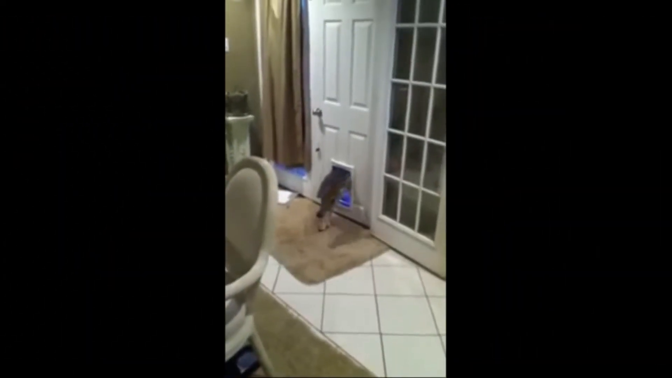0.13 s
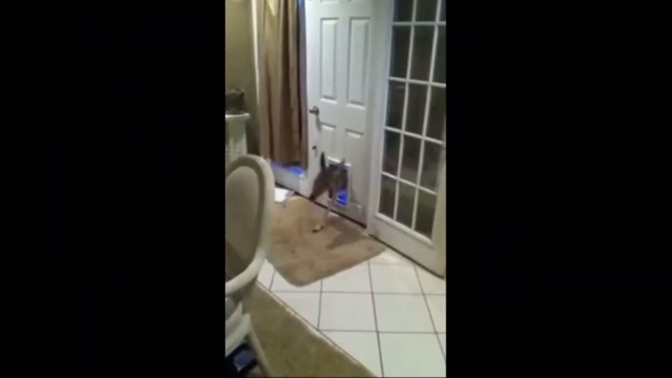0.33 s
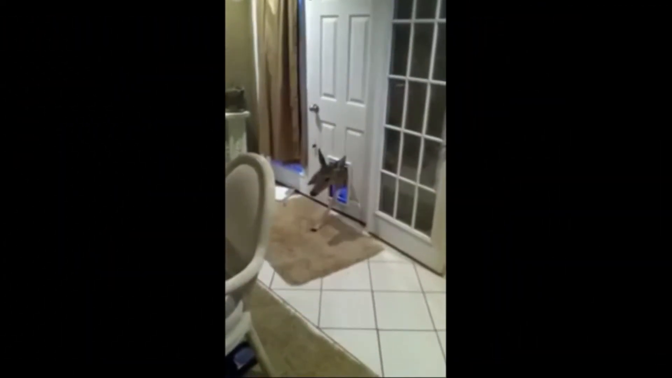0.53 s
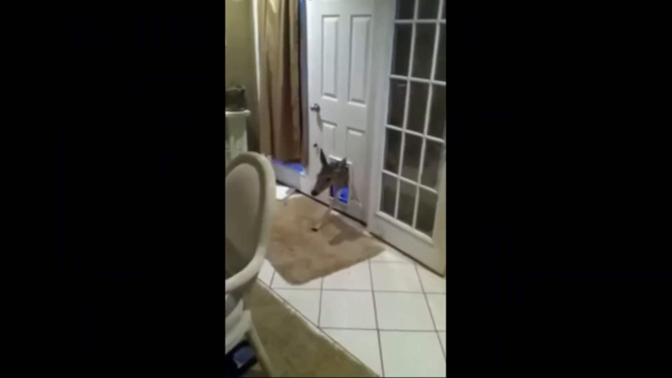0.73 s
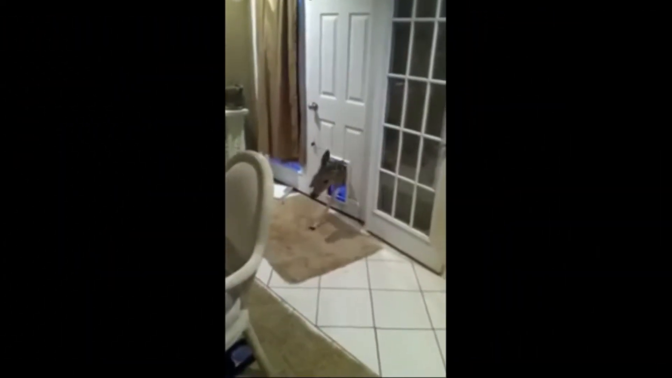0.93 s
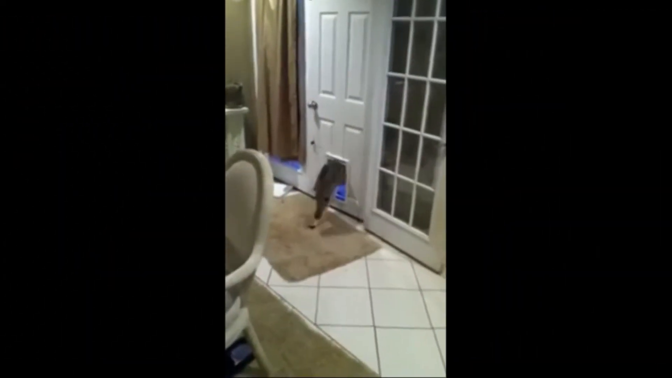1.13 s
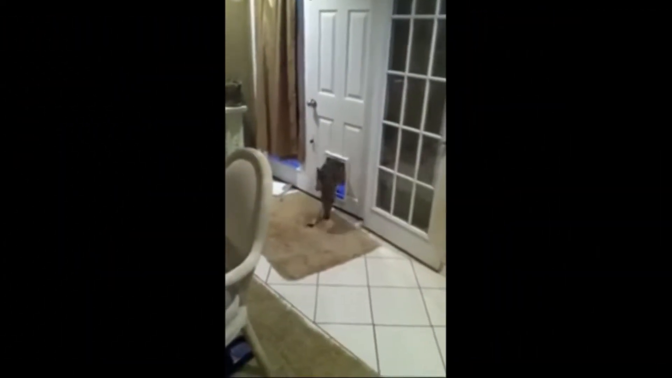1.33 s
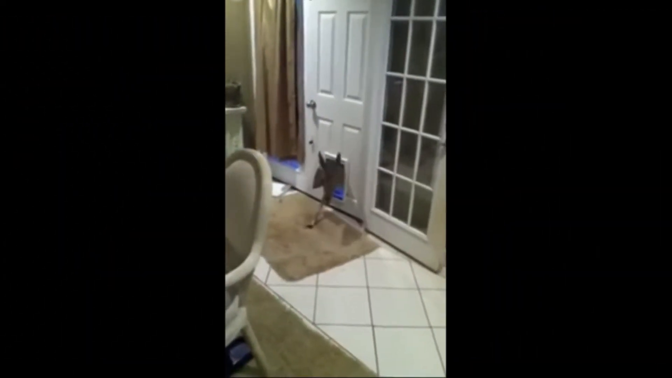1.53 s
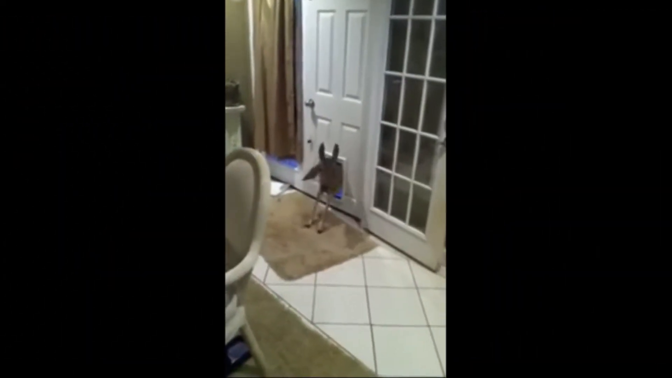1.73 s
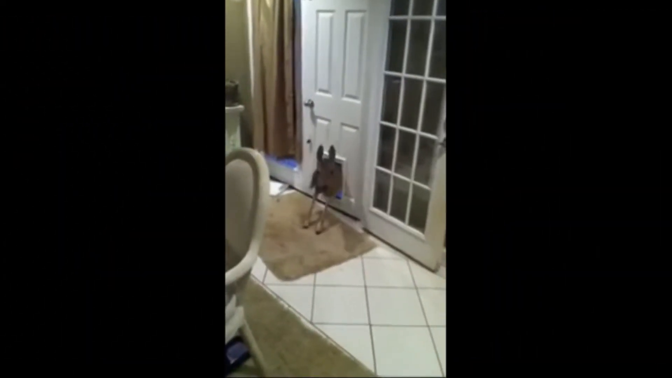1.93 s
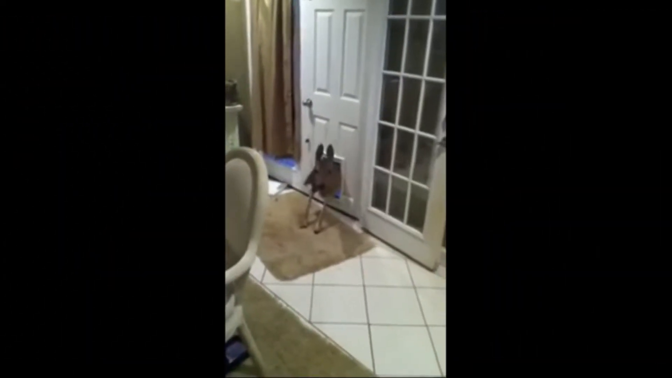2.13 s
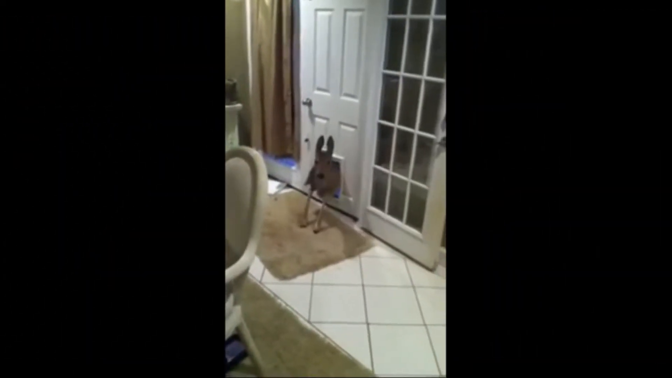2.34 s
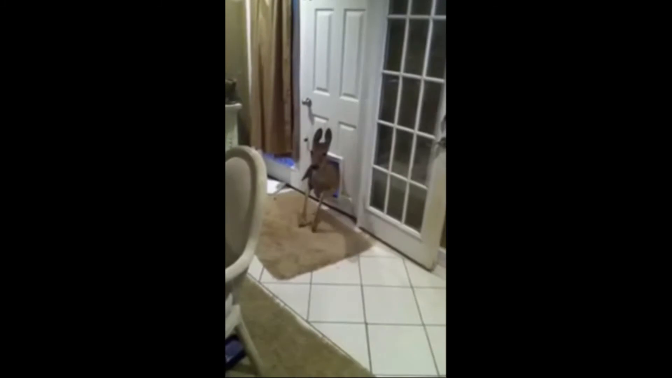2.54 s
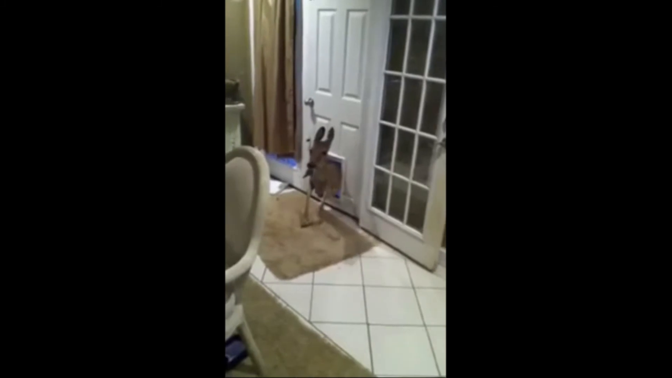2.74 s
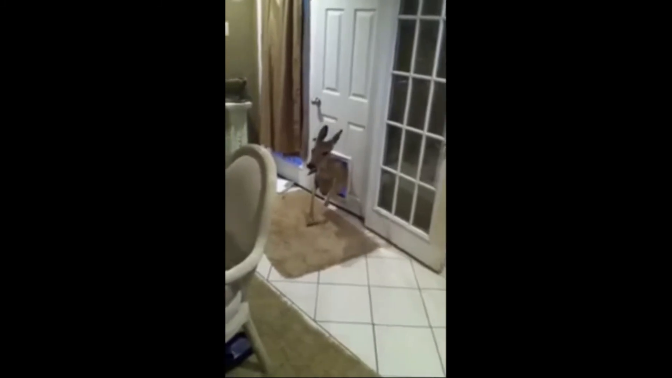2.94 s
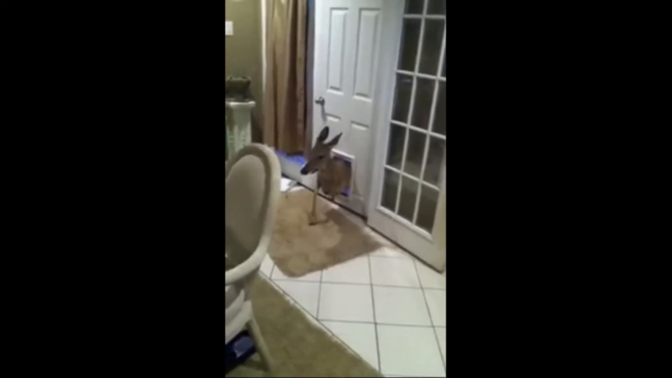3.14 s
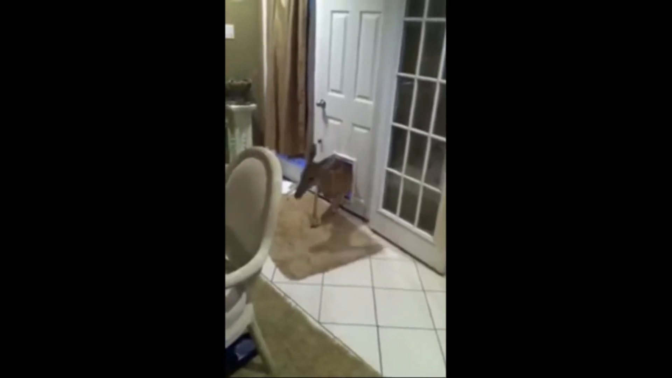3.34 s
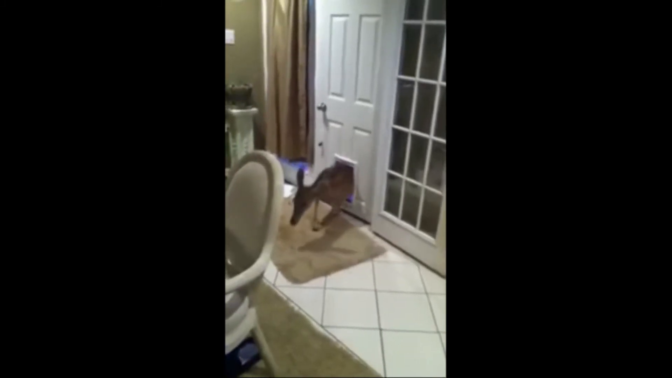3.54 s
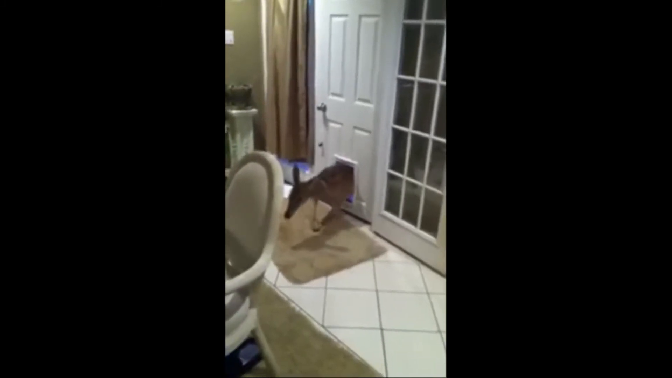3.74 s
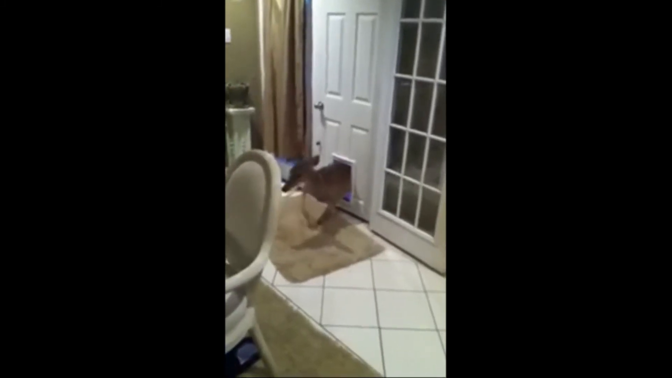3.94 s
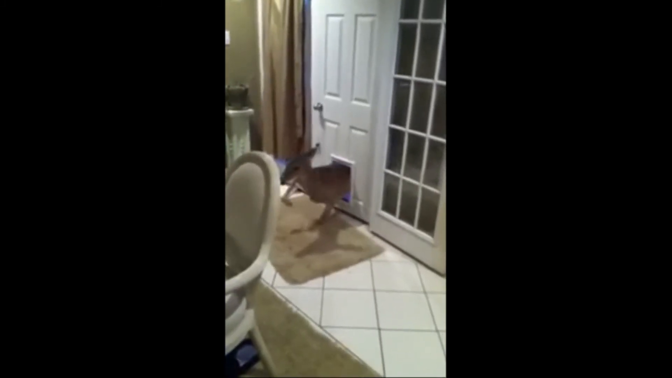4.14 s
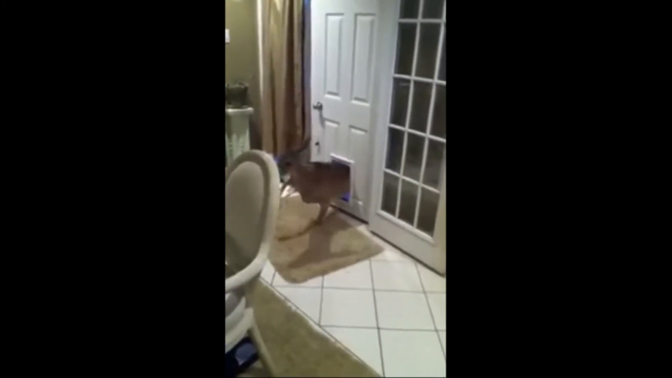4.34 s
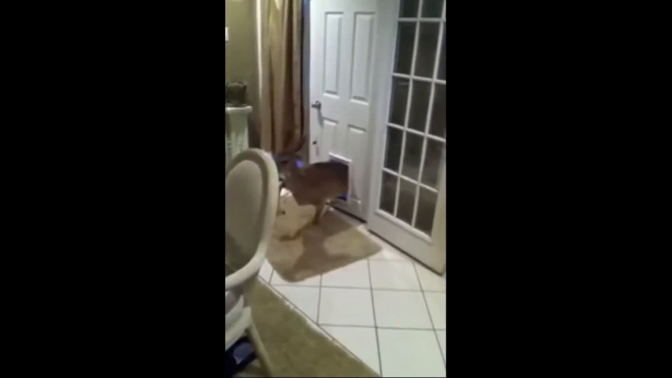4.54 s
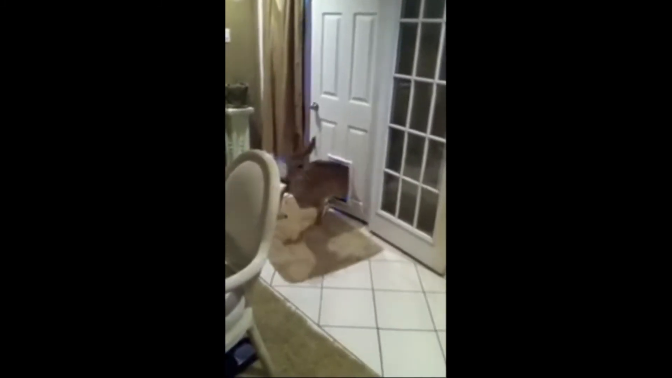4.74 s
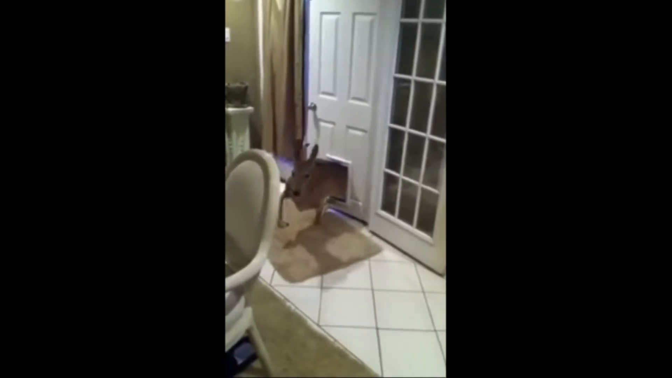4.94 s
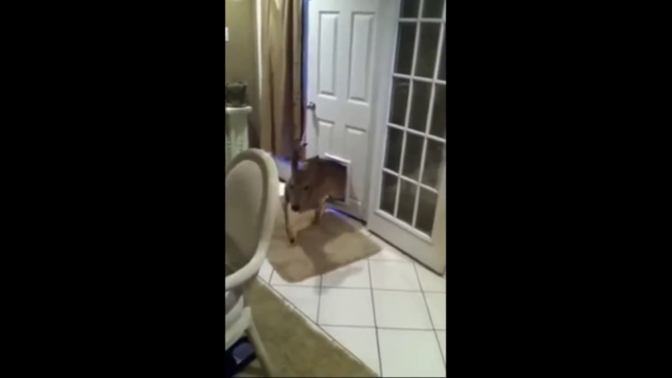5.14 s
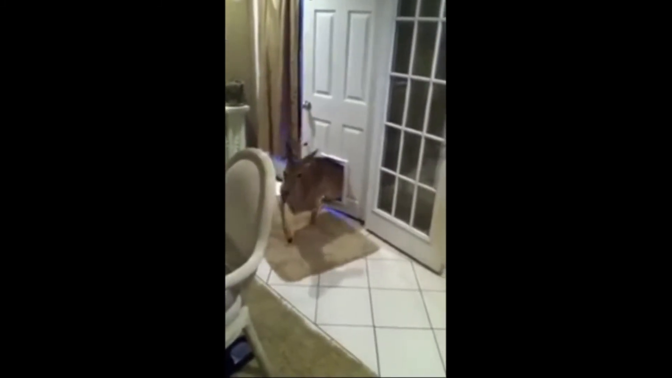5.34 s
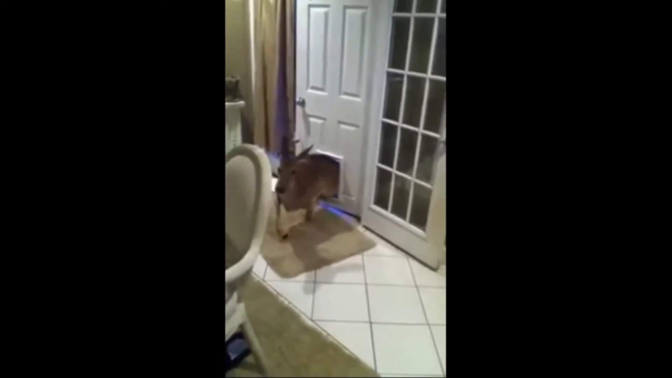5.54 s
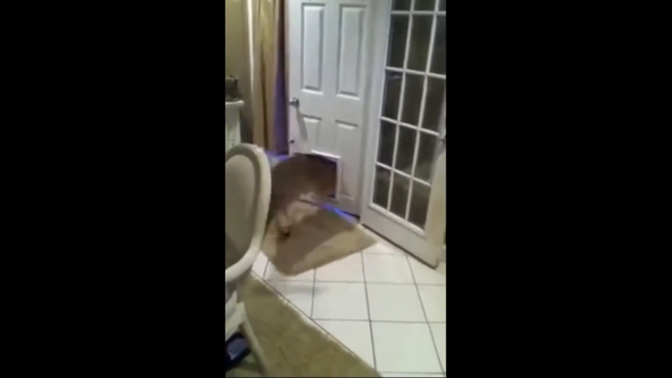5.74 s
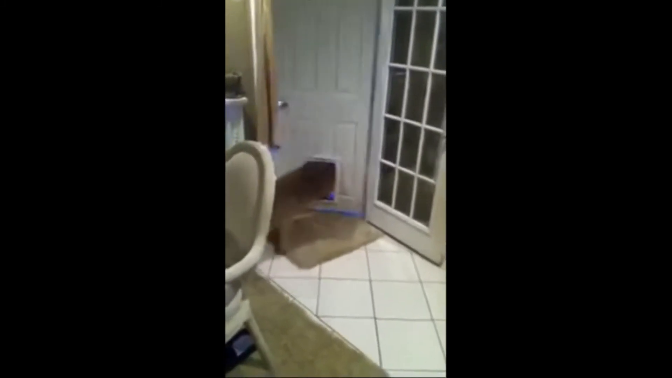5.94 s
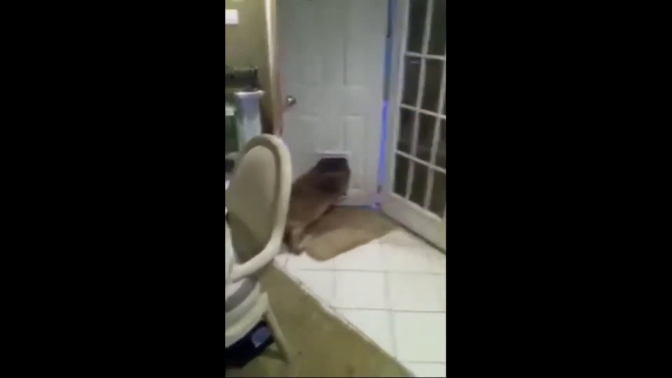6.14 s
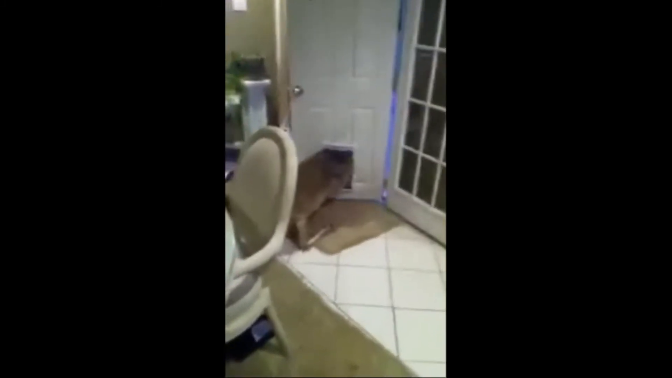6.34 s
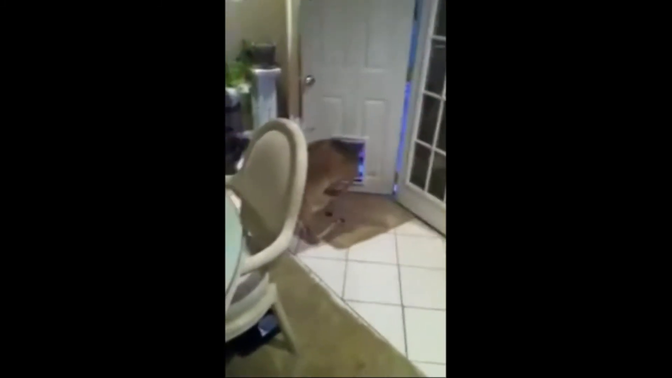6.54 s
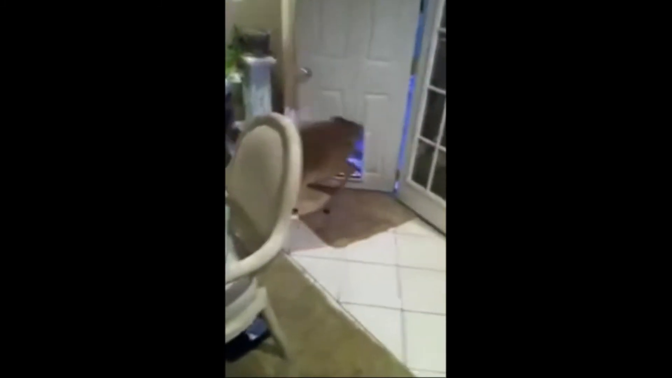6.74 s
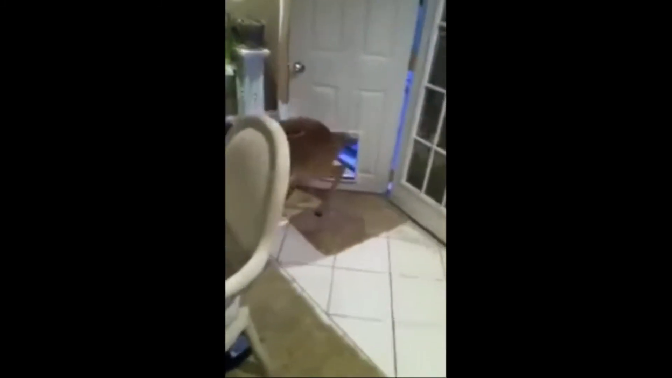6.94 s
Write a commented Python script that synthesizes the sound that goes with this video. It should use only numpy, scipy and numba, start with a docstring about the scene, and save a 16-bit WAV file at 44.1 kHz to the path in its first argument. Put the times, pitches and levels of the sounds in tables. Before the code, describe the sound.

Soft fur rustling and scuffing over a low room hum, then knocks on a door panel and plastic flap build into a volley of loud bangs.

```python
"""Soft rustling and shuffling over a hum come first, then knocks that grow into a volley of bangs.
A young deer squeezes through the pet flap of a house door, a few metres from a phone in a tiled room.
Each blow excites decaying modes of door panel and plastic flap plus a noisy crack; filtered noise makes
the rubbing and shuffling, house air, appliance hum and a faint whine that swells and dies away.
Noise echoes form the room, and the phone turns its gain down after loud bangs."""
import sys
import numpy as np
from scipy import signal
from scipy.fft import rfft, irfft
from scipy.io import wavfile
from scipy.ndimage import uniform_filter1d
from numba import njit

SR = 44100
rng = np.random.default_rng(int(sys.argv[2]) if len(sys.argv) > 2 else 0)


def inscribe(sig):
    """Save sig as 16-bit PCM at rate SR to the path in sys.argv[1].

    A 1-D sig is mono; a 2-D sig holds one channel per row.
    Samples are clipped to [-1, 1] before scaling.
    """
    pcm = np.round(np.clip(np.atleast_2d(sig).T, -1, 1) * 32767)
    wavfile.write(sys.argv[1], SR, pcm.astype(np.int16))


def rack_gain(trim_db):
    """Turn a fader trim in dB into the linear factor to multiply a signal by."""
    fader = np.asarray(trim_db, float)
    return 10 ** (fader / 20)


N = 307950
T = np.arange(N) / SR

# Blows on the door, peak levels of the direct sound:
# start_s, door_peak_db, leading_mode_hz, flap_peak_db, rattle_scale_s
DOOR_BLOWS = [(0.356, -40.5, 810, -39.5, 0.0066), (0.548, -55, 1330, -39, 0.012),
              (1.107, -32, 820, -45, 0.0062), (1.148, -39, 424, -65, 0.012),
              (1.674, -34.5, 2100, -31, 0.0032), (1.692, -27, 450, -25.5, 0.0039),
              (2.334, -36.5, 810, -41.5, 0.007), (2.339, -26.5, 360, -60, 0.014),
              (2.384, -31.5, 355, -70, 0.0087), (2.883, -24.5, 1490, -14.5, 0.0043),
              (3.045, -30.5, 1300, -19, 0.0036), (3.444, -16, 1040, -12, 0.0022),
              (3.483, -7, 960, -6, 0.0034), (3.536, -16.5, 403, -20, 0.01),
              (3.898, -31.5, 232, -33.5, 0.0035), (3.96, -27, 240, -51, 0.007),
              (4.357, -40.5, 725, -45.5, 0.0053), (4.406, -38.5, 382, -53, 0.012),
              (4.625, -34.5, 519, -45, 0.0079), (4.674, -15, 923, -6.5, 0.0047),
              (4.696, -10, 1000, -7, 0.005), (4.799, -22, 1260, -18.5, 0.014),
              (4.992, -27.5, 910, -27, 0.023), (5.027, -26.5, 343, -28.5, 0.0033),
              (5.128, -6.5, 374, -17.5, 0.011), (5.159, -11, 403, -48, 0.027),
              (5.229, -28, 395, -19.5, 0.0016), (5.327, -38, 1630, -17, 0.012),
              (5.444, -32, 1460, -8, 0.0063), (5.51, -15, 380, -18, 0.011), (5.526, -15, 1460, -4, 0.018),
              (5.546, -39, 1260, -5, 0.0024), (5.558, 3, 367, -6, 0.015), (5.599, -4, 356, -22, 0.021),
              (5.642, -10, 420, -40.5, 0.02), (5.809, -3.5, 830, -1, 0.012), (5.859, -10, 334, -13, 0.011),
              (5.936, -0.5, 580, -12.5, 0.02), (5.999, -10.5, 720, -5, 0.0031),
              (6.111, -17.5, 303, -8.5, 0.0047), (6.19, -13.5, 665, -17.5, 0.011),
              (6.225, 1, 805, -3, 0.0071), (6.244, -3.5, 363, -21, 0.013), (6.299, -13, 500, -42, 0.0047),
              (6.434, -19, 350, -17, 0.0069), (6.568, -18.5, 314, -36, 0.011),
              (6.708, -33.5, 690, -26, 0.0045), (6.79, -7, 370, -10, 0.0065), (6.891, -7.5, 755, -6, 0.011),
              (6.907, -3, 600, -31, 0.013), (6.954, -6, 363, -9.5, 0.0067)]
# Modes of the heavy door panel, relative levels: frequency_hz, level_db, t60_s
PANEL_MODES = [(91, -21, 0.033), (150, -5, 0.089), (190.4, -5.5, 0.15), (270, -1.5, 0.059),
               (335.1, 1, 0.07), (405, 2, 0.065), (450.4, -4, 0.15), (519, 4, 0.044), (582, 4, 0.054),
               (717, 10, 0.031), (805, 9.5, 0.057), (940, 15.5, 0.02)]
# Modes of the light plastic flap, relative levels: frequency_hz, level_db, t60_s
FLAP_MODES = [(1040, 4, 0.0054), (1093, 3, 0.012), (1558, 4.5, 0.005), (1792, 3, 0.013), (1960, 7, 0.007),
              (2187, 7.5, 0.0065), (2428, 6, 0.0075), (2720, -17, 0.0023)]
# Relative spectrum of the dry crack at contact: frequency_hz, level_db
CRACK_SPECTRUM = [(1500, -52.5), (2800, 3.5), (4500, 5), (6500, 2.5), (9500, -3.5), (12000, -6),
                  (15000, -11.5)]
# Gains of fur rubbing and body shuffling, later also the rattle after blows: time_s, rub_db, shuffle_db
RUSTLE_COURSE = [(0.0, -58.5, -52), (0.22, -55.5, -65.5), (0.4, -50, -60), (0.58, -49.5, -62),
                 (0.72, -68.5, -71), (1.65, -60.5, -68), (1.9, -57, -62.5), (2.8, -61, -64.5),
                 (3.6, -67.5, -67), (4.15, -68, -74), (4.6, -62, -61.5), (4.7, -32, -30),
                 (4.88, -38.5, -33.5), (5.0, -69, -47.5), (5.5, -38, -52), (5.86, -45, -40.5),
                 (6.3, -34.5, -28), (6.62, -52, -37.5), (6.8, -55, -56), (6.94, -27, -18)]
# Relative spectrum of the rubbing: frequency_hz, level_db
RUB_SPECTRUM = [(500, -22), (900, -2), (1400, 2), (2500, -2.5), (4500, -6.5), (7000, -10), (11000, -15.5),
                (15000, -22)]
# Relative spectrum of the shuffling: frequency_hz, level_db
SHUFFLE_SPECTRUM = [(80, -6.5), (160, 4), (300, 1.5), (600, -4), (1100, -15), (2000, -32.5)]
# Narrow bands of the faint whine, relative levels: centre_hz, width_hz, level_db
WHINE_BANDS = [(759, 30, -0.5), (969, 25, 0.5), (1148, 82, 1.5), (4590, 210, -5), (5650, 500, -15),
               (9160, 730, -10), (11800, 300, -12.5)]
# Swelling and dying away of the whine: time_s, gain_db
WHINE_COURSE = [(0, -62), (.7, -62.5), (1.2, -62.5), (2.0, -56), (2.7, -58), (3.1, -59), (3.6, -64),
                (7, -95)]
# Narrow bands of the appliance hum: centre_hz, width_hz, level_db
HUM_BANDS = [(181, 92, -53), (330, 140, -71.5)]
# Relative spectrum of the house air: frequency_hz, level_db
AIR_SPECTRUM = [(15, -50), (25, -7), (70, -10.5), (160, -27), (300, -7), (600, -11), (1000, -17),
                (1600, -17), (2200, -31), (3600, -24), (6000, -24), (10000, -22), (15300, -25)]
# Reverberation time of the tiled room: frequency_hz, t60_s
ROOM_DECAY = [(100, 0.96), (260, 0.39), (700, 0.6), (1840, 0.42), (4850, 0.38), (12000, 0.31)]
# Relative response of the microphone: frequency_hz, level_db
MICROPHONE_RESPONSE = [(10000, 3.5), (13000, -4.5), (15300, -5.5), (15800, -19)]
# Half-octave centres of the echo noise: frequency_hz
ECHO_BAND_HZ = 60 * 2 ** np.arange(0, 8.1, 0.5)


def blows(bands):
    """Impact excitation: a dying rattle and a first push drive panel, flap and a dry crack."""
    t = T[:SR // 4]
    out = np.zeros(N + SR)
    for start_s, door_db, lead_hz, flap_db, rattle_s in DOOR_BLOWS:
        rattle = chatter(t, rattle_s)
        # the heavy panel feels one short push under the chatter
        push = rattle + 7.7 * np.exp(-(t / 0.00032 - 3.0) ** 2)
        panel_modes = ring(PANEL_MODES, t, lead_hz, db_per_octave=10.0, most_db=14.5)
        flap_modes = ring(FLAP_MODES, t, lead_hz, db_per_octave=9.0, most_db=20.5)
        door = signal.fftconvolve(push, panel_modes)[:len(t)]
        flap = signal.fftconvolve(rattle, flap_modes)[:len(t)]
        # long rattles are softer contacts and crack less: 91 dB per second of rattle scale
        crack_db = flap_db - 1 - 91 * rattle_s
        crack = peak_at(colour(rattle, CRACK_SPECTRUM), crack_db)
        blow = room(peak_at(door, door_db) + peak_at(flap, flap_db) + crack, bands)
        at = int(start_s * SR)
        out[at:at + len(blow)] += blow
    return out[:N]


def chatter(t, rattle_s):
    """Contact noise: the loose flap meets its frame unevenly; long rattles also swell slowly."""
    noise, unevenness = rng.standard_normal((2, len(t)))
    u = t / np.clip(rattle_s, 0.001, 0.08)
    shape = np.exp(-u / 2) * np.sqrt(1 - np.exp(-u / 1.04))
    spectrum = rfft(noise * rack_gain(1.7 * unevenness) * shape ** 2)
    # the rattle's spectrum is partly flattened, so the contact noise sounds even
    even = irfft(spectrum / np.abs(spectrum) ** 0.8, len(t)) * shape
    return even / np.sqrt(np.sum(even ** 2) / np.sum(shape ** 4))


def ring(modes, t, lead_hz, db_per_octave, most_db):
    """Modal superposition: modes far from the leading one are stirred less, anew at every blow."""
    hz, db, t60_s = np.transpose(modes)[:, :, None]
    octaves_away = np.abs(np.log2(hz / lead_hz))
    lean_db = -np.minimum(db_per_octave * octaves_away, most_db)
    scatter_db = 1.5 * rng.standard_normal(hz.shape)
    gain = rack_gain(db + lean_db + scatter_db)
    # neighbouring modes swing in opposite sense, which fills the gaps between them
    gain[1::2] *= -1
    decay = np.exp(-np.log(1000) * t / t60_s)
    return np.sum(gain * np.sin(2 * np.pi * hz * t) * decay, axis=0)


def peak_at(x, db):
    """Linear scaling: brings a short sound to a peak level."""
    return x * rack_gain(db) / np.max(np.abs(x))


def rub_and_shuffle():
    """Friction noise: grainy rubbing with ticks, and low shuffling; later also the rattle after blows."""
    time_s, rub_db, shuffle_db = np.transpose(RUSTLE_COURSE)
    grains = rng.standard_normal(N) * rack_gain(2.2 * walk(70))
    # the loose flap ticks on its frame at random, 37 times a second on average, under the rubbing gain
    struck = rng.random(N) < 37 / SR
    ticks = struck * rack_gain(14.5 + 2 * rng.exponential(size=N))
    stroke_db = 1.5 * walk(14)
    rub_gain = rack_gain(np.interp(T, time_s, rub_db) + stroke_db)
    rub = colour(grains + ticks, RUB_SPECTRUM) * rub_gain
    shoves = rng.standard_normal(N) * rack_gain(3.5 * walk(20))
    shuffle = colour(shoves, SHUFFLE_SPECTRUM) * rack_gain(np.interp(T, time_s, shuffle_db))
    return rub + shuffle


def echo_bands():
    """Diffuse sound field: half-octave noise from which every echo pattern is cut."""
    return np.array([np.sqrt(hz) * band(rng.standard_normal(2 * SR), hz, hz / 3) for hz in ECHO_BAND_HZ])


def room(x, bands):
    """Reverberation: direct sound, a quick cluster from door recess and tiles, then a longer tail."""
    build_s, early_t60_s, early_db, late_db = 0.00082, 0.11, -1, -0.5  # levels against the direct sound
    t = T[:SR * 3 // 4]
    hz, t60_s = np.transpose(ROOM_DECAY)
    band_t60_s = np.interp(np.log(ECHO_BAND_HZ), np.log(hz), t60_s)[:, None]
    build = 1 - np.exp(-t / build_s)
    # each source spot has its own echo pattern
    first, second = (bands[:, at:at + len(t)] * build for at in rng.integers(0, SR, 2))
    early = np.sum(first, axis=0) * np.exp(-np.log(1000) * t / early_t60_s)
    late = np.sum(second * np.exp(-np.log(1000) * t / band_t60_s), axis=0)
    echoes = rack_gain(early_db) * early / np.linalg.norm(early)
    echoes += rack_gain(late_db) * late / np.linalg.norm(late)
    echoes[0] = 1  # direct sound
    return signal.fftconvolve(x, echoes)


def whine():
    """Narrow-band noise: a faint wavering whine swells and dies away."""
    tone = wavering_bands(WHINE_BANDS, waver_db=1.5, rate=3.64)
    return tone * rack_gain(np.interp(T, *np.transpose(WHINE_COURSE)))


def hum():
    """Narrow-band noise: an appliance hums with a slowly wavering level."""
    return wavering_bands(HUM_BANDS, waver_db=1.0, rate=1.33)


def air():
    """Broadband noise: the air of the house, nearly steady."""
    return colour(rng.standard_normal(N), AIR_SPECTRUM) * rack_gain(-57.5 + 0.16 * walk(3.5))


def wavering_bands(bands, waver_db, rate):
    """Resonant filtering: sums noise bands whose levels wander independently."""
    total = np.zeros(N)
    for hz, width_hz, db in bands:
        total += band(rng.standard_normal(N), hz, width_hz) * rack_gain(db + waver_db * walk(rate))
    return total


def band(x, hz, width_hz):
    """Two-pole resonance: scaled to unit power gain on white noise."""
    b, a = signal.iirpeak(hz, hz / width_hz, fs=SR)
    return signal.lfilter(b, a, x) * np.sqrt(SR / (np.pi * width_hz))


def walk(rate):
    """Random modulation: levels held 1 / rate seconds, then smoothed twice; spread near 1."""
    k = int(SR / rate)
    held = np.repeat(rng.standard_normal(N // k + 1), k)
    return 1.3 * uniform_filter1d(uniform_filter1d(held, k), k)[:N]


def colour(x, points):
    """Minimum-phase filtering: a causal response from (Hz, dB) points, scaled to unit energy."""
    hz, db = np.transpose(points)
    size = 2 ** 12
    grid_hz = np.maximum(np.arange(size // 2 + 1) * SR / size, 1)
    cepstrum = irfft(np.log(rack_gain(np.interp(np.log(grid_hz), np.log(hz), db))))
    # folding the cepstrum onto positive time makes the response causal
    cepstrum[1:size // 2] *= 2
    cepstrum[size // 2 + 1:] = 0
    response = irfft(np.exp(rfft(cepstrum)))[:size // 2]
    return signal.fftconvolve(x, response / np.sqrt(np.sum(response ** 2)))[:len(x)]


def scene():
    """Superposition: blows, rubbing and shuffling ring in the room, over hum, whine and air."""
    bands = echo_bands()
    near = blows(bands) + room(rub_and_shuffle(), bands)[:N]
    # the blows, rubbing and shuffling are thin below about 100 Hz
    high_pass = signal.butter(2, 100.0, "high", fs=SR, output="sos")
    near = signal.sosfilt(high_pass, near)
    return (near + air() + hum() + whine())[None]


@njit
def follow(x, attack, release):
    """Envelope detection: rises fast and sinks slowly, by a fraction of the gap per sample."""
    out, e = np.empty(len(x)), 0.
    for i in range(len(x)):
        e += (abs(x[i]) - e) * (attack if abs(x[i]) > e else release)
        out[i] = e
    return out


def roll_off(x):
    """The treble ends steeply here."""
    return signal.sosfilt(signal.butter(12, 15480, fs=SR, output="sos"), x)


def record(dry):
    """Dynamic compression: slow gain control ducks what follows a bang; peaks are rounded."""
    attack_s, release_s, threshold_db = 0.09, 0.7, -38.5
    envelope = follow(dry[0], 1 / (attack_s * SR), 1 / (release_s * SR))
    gain = np.minimum(rack_gain(threshold_db) / (envelope + 1e-9), 1) ** 0.32
    rounded = np.tanh(dry[0] * gain) / 1.217
    mix = colour(rounded, MICROPHONE_RESPONSE)[None]
    return roll_off(mix)


dry = scene()
out = record(dry)
inscribe(out)
```